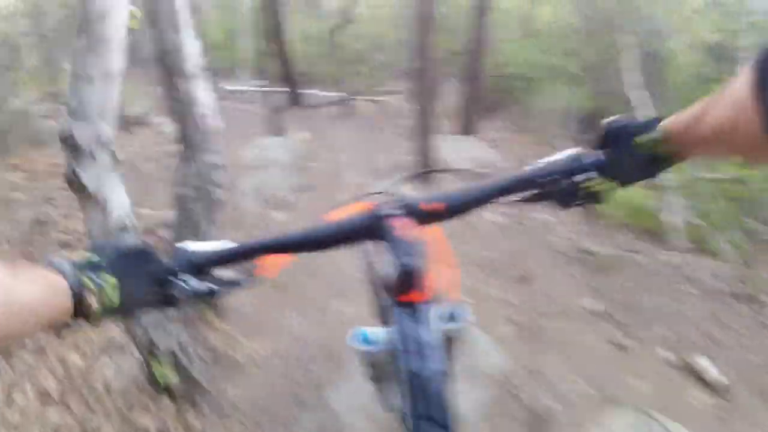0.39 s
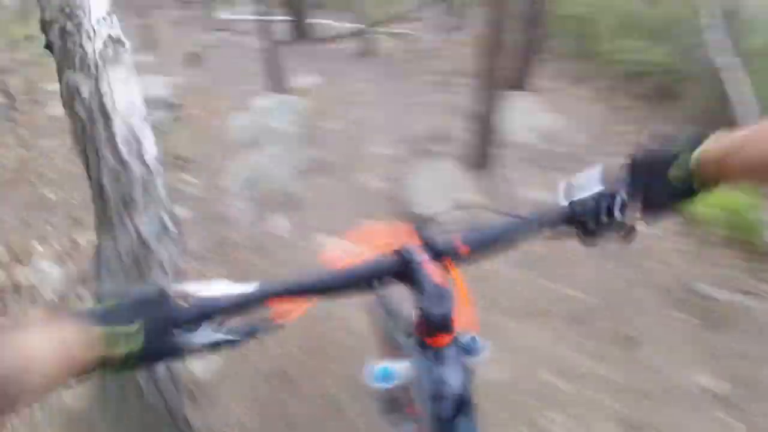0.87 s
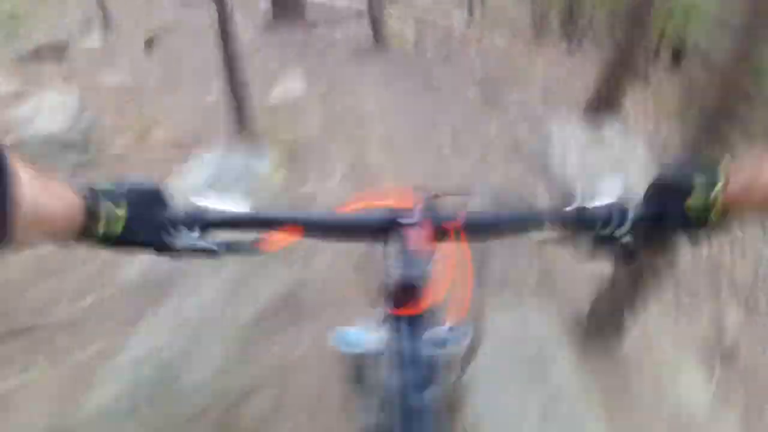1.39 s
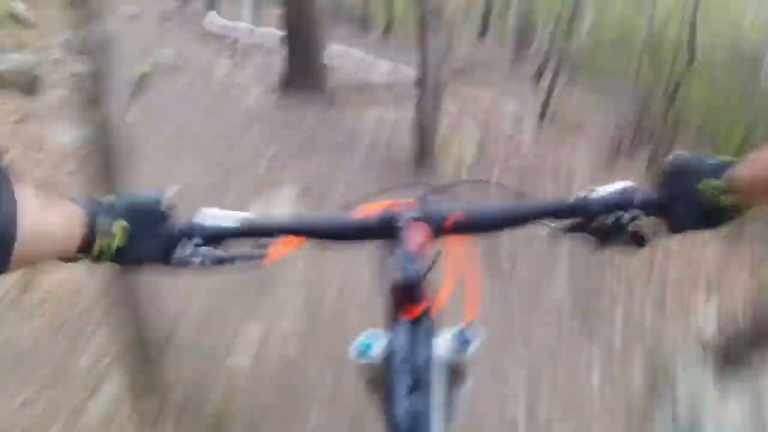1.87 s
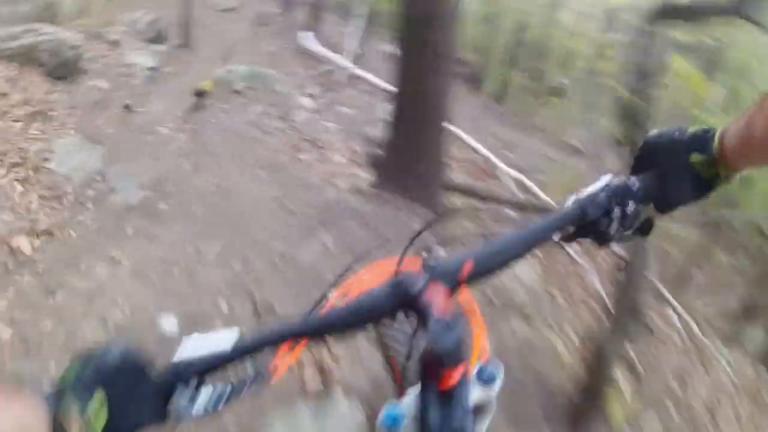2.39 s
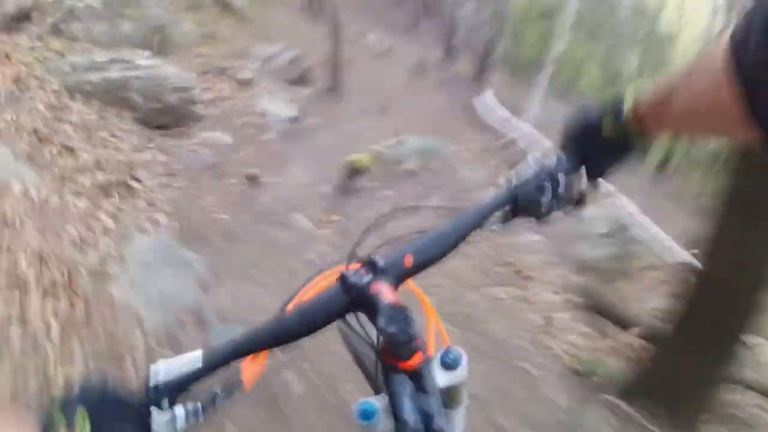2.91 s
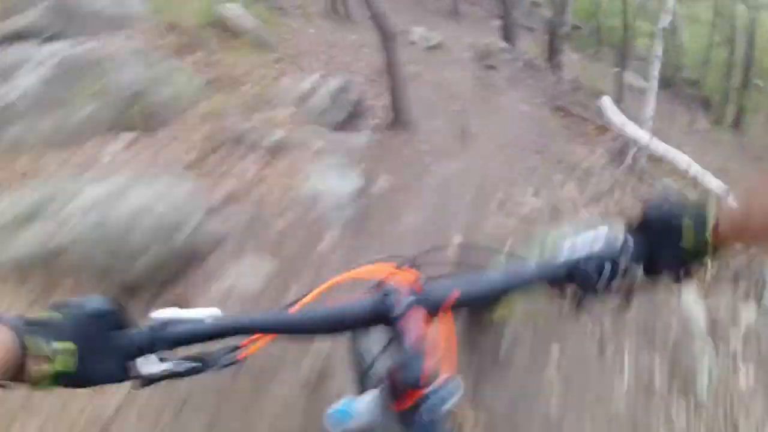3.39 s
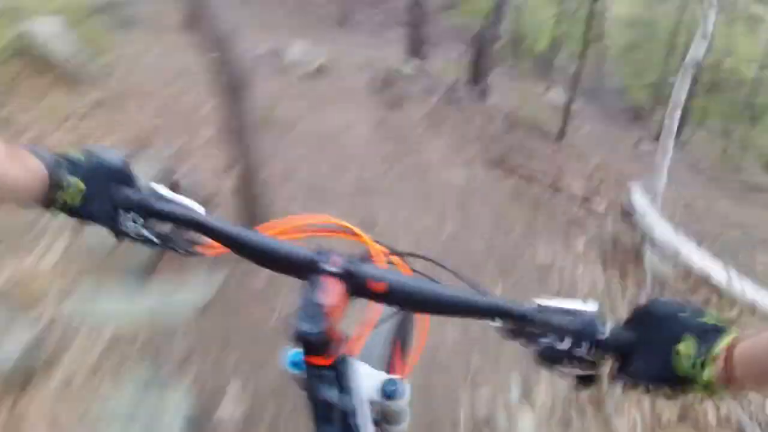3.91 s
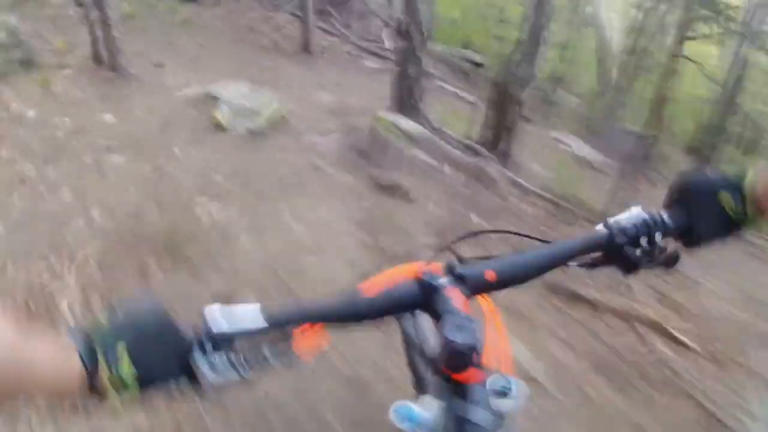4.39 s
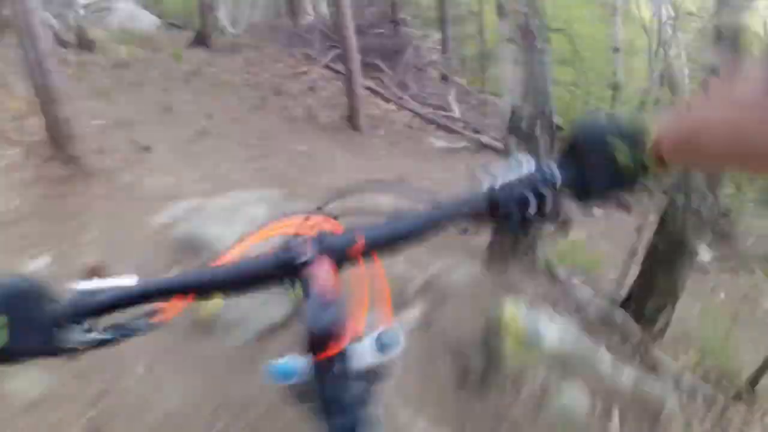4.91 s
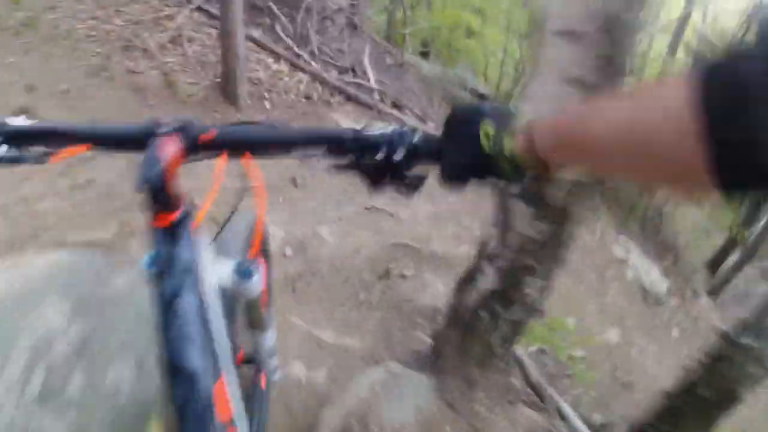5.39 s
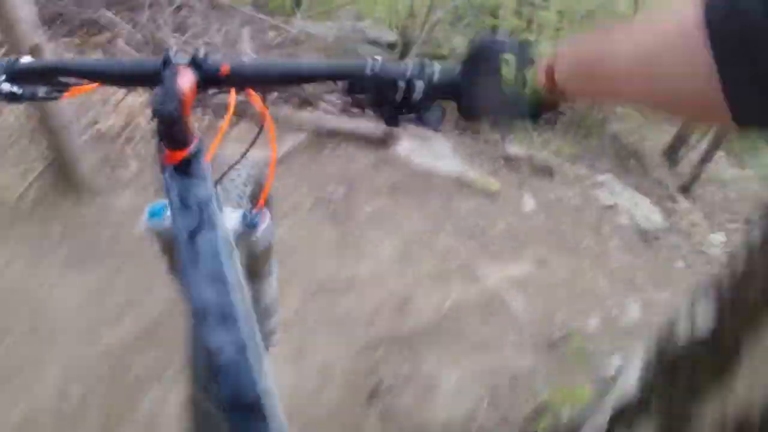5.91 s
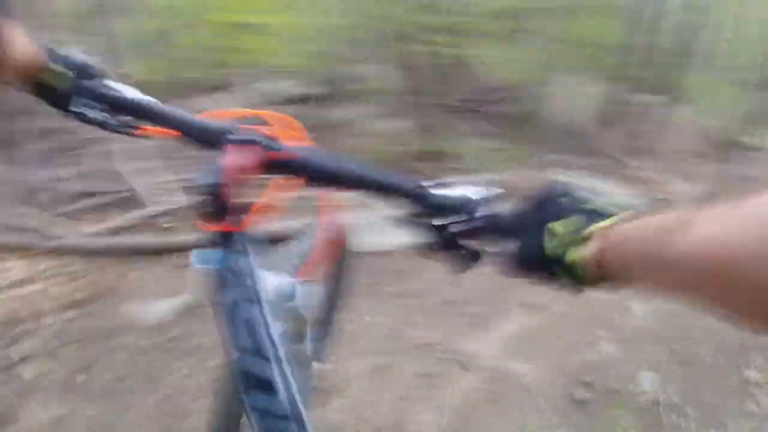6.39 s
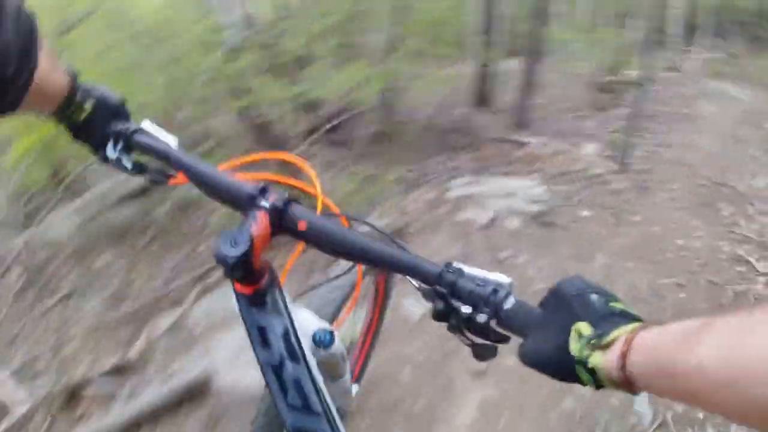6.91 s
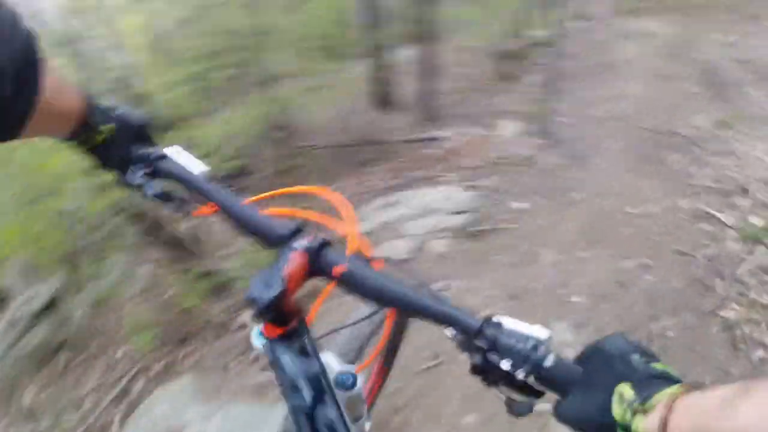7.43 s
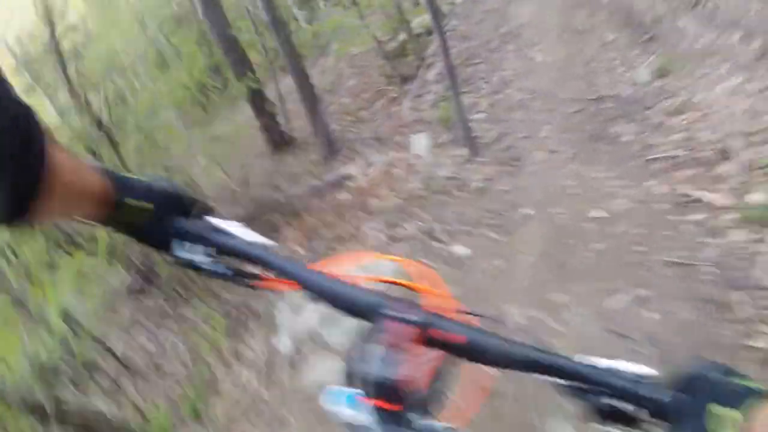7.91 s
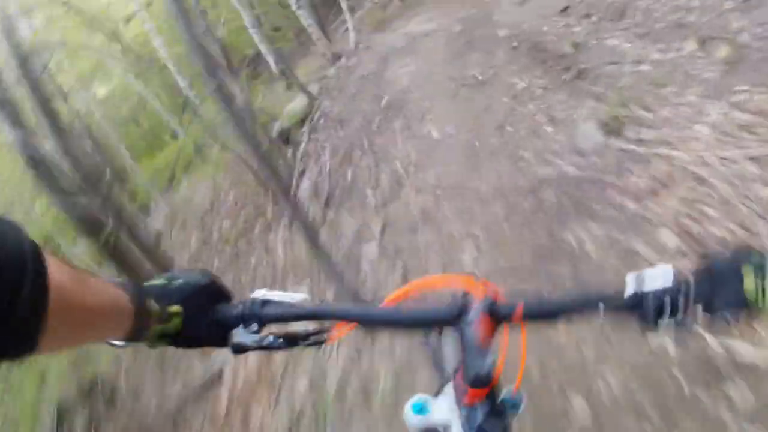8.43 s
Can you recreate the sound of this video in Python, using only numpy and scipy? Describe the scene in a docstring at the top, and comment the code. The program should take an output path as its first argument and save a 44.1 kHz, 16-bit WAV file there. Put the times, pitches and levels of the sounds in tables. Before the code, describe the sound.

A mountain bike descends a rocky dirt trail in woods, heard through a closed plastic housing on the rider's chest: close, dry, boxy, with gritty aliased treble. From 0 to 0.9 s, soft tyre hiss and small scuffs over faint air and low rumble. Around 1.0-1.2 s it hits rock, with a sharp clack at 1.2. From 1.4 to 2.0 comes the densest rattle: hard clacks near 1.54, 1.59 and 1.74, chattering plastic creaks, loud crunch, heavy sagging thuds and wind buffeting. Things ease from 2.3 to 3.4 with scuffs and light taps; quick dry creaks at 3.56, thin ticks at 3.7. From 4.3 jolts and creaks return, a knock at 4.45, then by far the loudest sharp crack at 4.95. Smaller knocks follow to 5.3, a squashy tyre scrape and thud at 5.8, creaks at 6.3-6.6. After that, quiet gritty rolling with a small tick near 7.5 until 8.5.

```python
"""A mountain bike rattles down a rocky trail, heard by a microphone in a closed housing on the rider's chest.
Close by, tyres crunch, scuff and squash on rock: hiss, gritty pops through ringing modes, hums of tyre air.
Knocks ring the housing, its mount creaks in chattering slips, and thin bright ticks stand out.
Below lie sagging thuds of frame and body, ground drumming and lumpy wind; a faint rush of air stays steady.
The recorder samples at 12 kHz and holds each sample, which mirrors the sound into the treble."""
import sys
import numpy as np
from scipy import signal
from scipy.io import wavfile
from scipy.ndimage import uniform_filter1d

SR = 44100
rng = np.random.default_rng(int(sys.argv[2]) if len(sys.argv) > 2 else 0)


def voltage_ratio(level):
    """Linear amplitude factor for a level in decibels (scalar or array-like)."""
    return 10 ** (np.asarray(level, float) / 20)


def generate_wav(sig):
    """Save sig (samples, or channels by samples) to the path in sys.argv[1] as 16-bit PCM at SR."""
    pcm = np.round(np.clip(np.atleast_2d(sig).T, -1, 1) * 32767).astype(np.int16)
    wavfile.write(sys.argv[1], SR, pcm)


N = 376613  # samples

# modes the closed housing rings with: f/Hz, width/Hz, relative level/dB
HOUSING = [(1130, 220, 8.5), (1355, 112, 10), (1506, 350, 15.5), (1827, 145, 10), (2245, 262, 15),
           (2980, 760, 12.5), (3255, 320, 11), (4070, 160, -3.5)]
# the ride along the trail: t/s, wind rumble level/dB, steady tyre crunch level before its blend/dB,
# ground drumming level/dB
TRAIL = [(0, -55.5, -59, -67), (.85, -55.5, -56.5, -58.5), (1.05, -44.5, -57, -60),
         (1.35, -43, -50.5, -52.5), (1.7, -39, -44, -47), (2.05, -45, -49, -57),
         (2.45, -49.5, -53.5, -55.5), (3.05, -50, -55, -55.5), (3.5, -48.5, -53, -53.5),
         (4.2, -48, -54, -56), (4.6, -44, -50.5, -52), (5.2, -43.5, -54.5, -55.5), (5.6, -51.5, -54.5, -56),
         (6.35, -46.5, -57.5, -58), (6.65, -54, -61.5, -67), (7.5, -58.5, -61.5, -71),
         (8.25, -55, -63.5, -68.5), (8.54, -55.5, -56, -68)]
# tyres scuffing over rock and loose grit: middle t/s, level before the crunch blend/dB, length/ms
SCUFFS = [(.396, -50.5, 72), (.475, -55.5, 41), (.564, -52, 40), (1.0, -51.5, 126), (1.099, -43.5, 33),
          (1.196, -49, 79), (1.429, -45, 67), (1.671, -40, 84), (1.81, -38, 19), (1.891, -55, 70),
          (2.09, -45.5, 81), (2.314, -52.5, 36), (2.591, -47.5, 23), (2.925, -54, 15), (3.175, -47, 54),
          (3.288, -51, 120), (3.483, -46.5, 124), (3.693, -53, 16), (3.83, -47, 16), (3.919, -51, 53),
          (4.106, -51, 32), (4.29, -50, 45), (4.423, -43.5, 76), (4.644, -44.5, 11), (4.87, -41.5, 18),
          (4.985, -54, 97), (5.09, -46, 35), (5.281, -47, 106), (5.54, -45.5, 11), (5.76, -51.5, 160),
          (5.831, -47, 79), (6.24, -51.5, 104), (6.33, -49, 35), (6.39, -49, 47), (6.473, -46.5, 16),
          (6.53, -47.5, 16), (6.767, -51.5, 14), (6.93, -56.5, 25), (7.088, -58, 38), (7.194, -52, 46),
          (7.496, -55, 50), (7.74, -56, 29), (8.065, -60.5, 85)]


def read(points, hz):
    """Reads a spectrum between its points, along a logarithmic frequency axis."""
    f, value = np.transpose(points)
    return np.interp(np.log(hz + 1), np.log(f + 1), value)


def evened(x):
    """Scales a signal to an rms of one."""
    return x / np.sqrt(np.mean(x ** 2) + 1e-20)


def add(mix, sound):
    """Adds a sound at the start of a stretch of the mix."""
    mix[:len(sound)] += sound


def control(curve, column=1):
    """Amplitude over time from one dB column of a table."""
    points = np.transpose(curve)
    return voltage_ratio(np.interp(np.arange(N) / SR, points[0], points[column]))


def rings(modes, tilt_db=0, rise_s=0.00034):
    """Response to one tick: a decaying sine for each mode, swelling in softly."""
    hz, width, db = np.transpose(modes)[:, :, None]
    t = np.arange(1200) / SR
    swell = (1 - np.exp(-t / rise_s)) ** 2
    sign = (-1.) ** np.arange(len(hz))[:, None]  # neighbouring modes start in opposite directions
    decay = voltage_ratio(db + tilt_db) * np.exp(-np.pi * width * t)
    return swell * (sign * decay * np.sin(2 * np.pi * hz * t)).sum(0)


def noise(spectrum, size, patch_db, flicker_db, span, wander=0):
    """Random short-time spectra with drifting patches, a flicker common to all bands and wandering pitch."""
    hop = size // 4
    hz = np.fft.rfftfreq(size, 1 / SR)
    a, b, patches = rng.standard_normal((N // hop + 5, len(hz), 3)).T
    flicker = evened(uniform_filter1d(patches[0], size=span))
    patches = uniform_filter1d(patches, size=3, axis=0)
    patches = evened(uniform_filter1d(patches, size=span, axis=1))
    drift = 1 + wander * evened(uniform_filter1d(a[0], size=4 * span))
    level_db = read(spectrum, hz[:, None] * drift) + patch_db * patches + flicker_db * flicker
    z = (a + 1j * b) * voltage_ratio(level_db)
    return evened(signal.istft(z, nperseg=size, noverlap=size - hop)[1][:N])


def bursts(events):
    """Power of sounds that swell, hold and fade over soft edges."""
    edge_s = 0.0037
    power = np.zeros(N)
    for s, db, ms in events:
        first = max(round((s - .3) * SR), 0)
        t = np.arange(first, min(first + round(.6 * SR), N)) / SR
        beyond_s = abs(t - s) - ms / 2000  # time outside the held part
        add(power[first:], voltage_ratio(2 * db) / (1 + np.exp(beyond_s / edge_s)))
    return power


def tyres():
    """A smooth hiss plus grit that pops in clumps and rings the housing at two spots."""
    # tyre hiss inside the housing: f/Hz, relative level/dB per Hz
    hiss_spectrum = [(350, -5), (600, -11.5), (900, -15), (1250, -2), (1600, -16), (1900, 1.5),
                     (2500, -9.5), (3000, -1.5), (4200, -11), (5300, -14.5), (6500, 3.5), (8000, -41)]
    hiss = noise(hiss_spectrum, size=256, patch_db=2.0, flicker_db=1.5, span=12, wander=0.028)
    clumps = voltage_ratio(4.0 * evened(uniform_filter1d(rng.standard_normal(N), size=600)))
    chance, size, spot = rng.random(N), rng.exponential(1, N), rng.standard_normal(N)
    popping = chance < 900 * clumps / SR  # 900 pops a second where clumps is one
    direction = np.sign(np.abs(spot) - .67)  # about half push, half pull
    pops = voltage_ratio(2.55 * np.minimum(size, 3.5)) * popping * direction
    octaves = np.log2(np.transpose(HOUSING)[0][:, None] / 2000)
    dull = signal.oaconvolve(pops * (spot < 0), rings(HOUSING, -4.0 * octaves))
    bright = signal.oaconvolve(pops * (spot > 0), rings(HOUSING, 5.7 * octaves))
    grit = voltage_ratio(-5.5) * evened((dull + bright)[:N])
    crunch = np.sqrt(control(TRAIL, column=2) ** 2 + bursts(SCUFFS))
    return crunch * (voltage_ratio(-4.5) * hiss + grit) + voltage_ratio(-72.5) * hiss


def squashes():
    """A tyre squashed on rock: rubbing noise rings the air in it while it is pressed flat."""
    # presses of the tyre: middle t/s, level/dB, length/ms
    presses = [(.945, -54.5, 7.4), (3.29, -58.5, 54), (5.76, -50, 50), (5.833, -53, 27), (6.22, -53, 22)]
    # resonances of the air inside: f/Hz, width/Hz, relative level/dB
    tyre_air = [(342, 31, 3), (530, 190, -5), (910, 360, -4)]
    t = np.arange(4000) / SR
    ring = np.zeros(len(t))
    for hz, width, db in tyre_air:
        decay = np.sqrt(width) * np.exp(-np.pi * width * t)
        ring += voltage_ratio(db) * decay * np.sin(2 * np.pi * hz * t)
    hum = signal.oaconvolve(rng.standard_normal(N), ring)[:N]
    return np.sqrt(bursts(presses)) * evened(hum)


def crack():
    """First contact bends through the plastic, treble first: a short sweep falling to the middle."""
    from_hz, to_hz, glide_s, fade_s = 3900, 1690, 0.0021, 0.00044
    t = np.arange(1200) / SR
    hz = to_hz + (from_hz - to_hz) * np.exp(-t / glide_s)
    envelope = (1 - np.exp(-t / 0.00026)) ** 2 * np.exp(-t / fade_s)
    return voltage_ratio(11.5) * envelope * np.sin(2 * np.pi * np.cumsum(hz) / SR)


def knocks():
    """Each blow is a brief scrape, a hard tick and weaker rebounds; where it lands sets the share of the modes."""
    # knocks of chain, frame and stones: t/s, peak level before the 220 Hz thump/dB,
    # low-mode offset/dB, high-mode offset/dB, nominal contact/ms
    blows = [(1.0186, -28, -35, -24, 0.85), (1.097, -25.5, -14, 5, 3.1), (1.1927, -14.5, -3.5, -6.5, 1),
             (1.414, -27.5, -2, 3, 6.2), (1.536, -13.5, -6, -3, 2.3), (1.5881, -14, -7, -15, 1.9),
             (1.638, -32, 0, -7, 2.9), (1.649, -29.5, -18, -17, 5.5), (1.658, -32, -15, 8, 2),
             (1.702, -21, -6, -5, 2.3), (1.7385, -14.5, -29, -12, 2.5), (1.7935, -23.5, -3, -19, 3.5),
             (1.82, -30.5, 3, -16, 2.8), (1.8528, -37, -2, -10, 4.9), (1.8854, -27, -17, 5, 1.5),
             (1.9111, -27.5, -4.5, 3.5, 9.7), (2.0573, -22.5, -5, 9, 5.1), (2.1995, -29.5, 2, -29, 1.8),
             (2.2492, -27.5, -5.5, -13, 4.1), (2.76, -38, -27, -4, 7.6), (2.9236, -38.5, -11, 19, 6.2),
             (2.97, -42, -7, 3, 3.6), (3.369, -35, -15, 0, 1.2), (3.692, -30.5, -22, -4, 3.5),
             (3.752, -36.5, -11, 0, 3.6), (3.911, -35.5, -10, -23, 4.8), (4.094, -39, -3, -1, 7),
             (4.33, -39.5, 2, -15, 13), (4.3873, -33.5, -3, 5, 2.5), (4.4264, -30, -20, -7, 3.1),
             (4.454, -19, -20, -2, 1.5), (4.527, -33.5, -26, 3, 3.5), (4.6846, -34.5, -22, -2.5, 12),
             (4.8609, -34.5, -1, -19, 3.8), (4.9032, -32, -17, 16, 1.8), (4.949, -6.5, -4.5, -8, 2.5),
             (4.9917, -27.5, -6, -24, 1.3), (5.1962, -33, -10, 3, 3), (5.251, -27.5, 0, -27, 2.7),
             (5.2738, -31.5, -18, 4, 2.6), (5.89, -33.5, -10, -16, 4.9), (6.2632, -31, -6.5, 6, 9.4),
             (6.48, -32.5, 0, -18, 3.2), (6.748, -40.5, -11, -2, 3.2), (7.471, -43, -15, 6, 1.5),
             (7.493, -31.5, -29.5, 8, 3.8), (7.514, -47, -5, 5, 2)]
    outer_low_db, outer_high_db = 2.5, 8  # a blow drives the outer modes harder than grit does
    out = np.zeros(N + SR)
    lead = 200  # samples of scrape ahead of the tick
    t = (np.arange(1100) - lead) / SR
    hz = np.transpose(HOUSING)[0][:, None]
    low, high = hz < 1550, hz > 2650
    # the stiff housing passes little of a blow outside this band
    stiff = signal.butter(N=2, Wn=[270, 3100], btype="band", fs=SR, output="sos")
    thump = voltage_ratio(-16.5) * (t > 0) * np.sin(2 * np.pi * 220 * t) * np.exp(-t / 0.0016)
    draws = rng.standard_normal((len(blows), len(t), 2)).transpose(0, 2, 1)
    spots = rng.standard_normal((len(blows), len(HOUSING), 2))
    for (s, db, low_db, high_db, ms), (chance, size), spot in zip(blows, draws, spots):
        scrape = 0.33 * np.exp(t / 0.0025)
        rebound = 0.87 * np.exp(-t * 1000 / max(ms, .3))
        fade = np.where(t < 0, scrape, rebound) * min(ms / 3.8, 1)  # brief contacts are cleaner
        hits = (chance > 1.6) * np.clip(size, -1.1, 1.1) * fade
        hits[lead] = 1
        shift = 1 + 0.03 * spot[:, :1] * [1, 0, 0]
        modes = np.array(HOUSING) * [1, 1.6, 1] * shift  # contact damps and shifts the modes
        tilt_db = low * (low_db + outer_low_db) + high * (high_db + outer_high_db)
        ring = rings(modes, tilt_db + 3.6 * spot[:, 1:], rise_s=0.00027)
        blow = signal.sosfilt(stiff, np.convolve(hits, ring + crack()))
        blow /= abs(blow).max()
        add(blow, thump)
        add(out[round(s * SR) - lead:], voltage_ratio(db) * blow)
    return out[:N]


def slipping(events, modes):
    """Dense uneven slips that weaken; each rings a small part a little higher or lower."""
    bends = (-1, 0, 1)
    slips = np.zeros((len(bends), N + SR))
    draws = rng.standard_normal((len(events), 60, 3))
    first = 6  # the main slip; those before it are faint
    for (s, db, ms), draw in zip(events, draws):
        at = np.cumsum(0.0007 * np.exp(0.55 * draw[:, 0]))
        at -= at[first]
        # long creaks start with stronger faint slips
        early = 0.033 * min(ms, 10) * np.exp(np.minimum(at, 0) / 0.004)
        late = voltage_ratio(-300.0 * at) / (1 + np.exp((at - ms / 1000) / 0.00083))
        size = voltage_ratio(db - 4.5 + 2.55 * draw[:, 1]) * np.where(at < 0, early, late)
        size[first] = voltage_ratio(db)
        bend = np.digitize(draw[:, 2], [-.43, .43])  # about a third each
        np.add.at(slips, (bend, np.round((s + at) * SR).astype(int)), size)
    ring = np.array([rings(np.array(modes) * [1 + 0.033 * b, 1, 1], rise_s=.0001) for b in bends])
    return signal.oaconvolve(slips, ring / abs(ring).max(), axes=1).sum(0)[:N]


def mount_creaks():
    """The plastic mount slips or chatters in short bursts and rings."""
    # creaks of the mount: main slip t/s, its level/dB, length/ms
    events = [(0.989, -29.5, 11), (1.1578, -33.5, 4.2), (1.179, -38, 4.1), (1.1918, -35, 2),
              (1.4446, -21.5, 2.1), (1.4535, -29, 3), (1.474, -25.5, 11.3), (1.533, -27.5, 10),
              (1.553, -40, 10), (1.569, -34.5, 12), (1.669, -20, 5.4), (1.6745, -25, 2.2),
              (1.7285, -26, 7.1), (1.8265, -28, 4.6), (1.8633, -33, 11), (1.964, -32, 7.7),
              (1.9763, -31, 11.5), (3.556, -28, 0.65), (3.562, -27, 0.8), (3.568, -23, 1),
              (3.5722, -35, 9.2), (3.6112, -44, 6), (3.623, -38.5, 7.2), (4.2802, -31.5, 11.5),
              (4.3284, -25.5, 12.6), (4.406, -33, 12), (4.42, -35, 11), (4.4564, -30, 7.7),
              (4.7305, -29, 4.2), (4.742, -28, 11.5), (4.822, -38, 5.7), (4.836, -34.5, 12),
              (4.8672, -34, 6.4), (4.9486, -6, 0.72), (4.9715, -41, 6.1), (5.0825, -27, 6.5),
              (5.2603, -31.5, 12), (5.3134, -28, 13), (6.329, -30.5, 5.4), (6.3397, -26.5, 7.9),
              (6.377, -27.5, 9.5), (6.433, -34, 12), (6.452, -40, 14), (6.4777, -32.5, 3.4),
              (6.555, -39, 5.3), (6.5882, -37, 10)]
    # modes of the mount: f/Hz, width/Hz, relative level/dB
    mount = [(5100, 677, 8.5), (3870, 1370, -4), (3540, 1110, 6)]
    return slipping(events, mount)


def bright_ticks():
    """Thin bright ticks, perhaps a cable on the frame, made of slips ringing two high modes."""
    # ticks: main slip t/s, its level/dB, length/ms
    events = [(3.682, -42, 5.8), (3.691, -34, 10.3), (5.939, -42, 1.1)]
    # modes of a tick: f/Hz, width/Hz, relative level/dB
    modes = [(3960, 250, 1), (5500, 810, 1)]
    return slipping(events, modes)


def jolts():
    """Each thud is a short swing whose pitch sags; returns the sound and its power."""
    # thuds of frame and rider's body that shake the housing: middle t/s, envelope peak level/dB, middle f/Hz
    thuds = [(0.277, -44.5, 52.7), (.434, -44, 40), (0.65, -41, 53.3), (1.007, -38, 44), (1.141, -38, 38.6),
             (1.25, -37, 42.5), (1.488, -34, 37.4), (1.568, -32.5, 37.6), (1.685, -31, 40),
             (1.805, -33, 40.3), (2.12, -35.5, 40), (2.266, -39.5, 32.6), (2.804, -45, 51.7),
             (3.071, -43, 39.5), (3.285, -45, 55.3), (3.634, -40, 49.7), (4.1, -38, 33.3),
             (4.361, -33.5, 37.8), (4.456, -35, 62.5), (4.631, -35, 59), (4.879, -32, 65.3),
             (5.15, -35.5, 40.4), (5.235, -36, 47.5), (5.493, -41.5, 63.3), (5.816, -32.5, 38.6),
             (6.317, -36.5, 42.5), (6.972, -48, 55), (7.338, -46.5, 50.7), (7.713, -48, 57.4),
             (8.477, -47, 60.7)]
    cycles, sag = 0.42, 0.296  # a thud lasts about a cycle and its pitch sags
    sound, power = np.zeros((2, N + SR))
    half = SR // 10
    t = np.arange(-half, half) / SR
    for (s, db, hz), start in zip(thuds, rng.random((len(thuds), 1))):
        u = t * hz / cycles
        shape = voltage_ratio(db) * np.exp(-u ** 2 / 2)
        turns = np.cumsum(hz * (1 - sag * np.tanh(u))) / SR + start
        begin = round(s * SR) - half
        add(sound[begin:], shape * np.sin(2 * np.pi * turns))
        add(power[begin:], shape ** 2)
    return sound[:N], power[:N]


def ground_drumming(shaking):
    """The ground drums through the frame as low noise that follows trail, scuffs and jolts."""
    # drumming: f/Hz, relative level/dB per Hz
    spectrum = [(60, -5), (150, 5), (330, -4.5), (450, -15.5), (700, -22), (1100, -32), (2000, -67)]
    scuff_db, jolt_db = -13, -16  # drumming against scuffs and jolts
    drum = noise(spectrum, size=1024, patch_db=2.0, flicker_db=2.0, span=8)
    power = control(TRAIL, column=3) ** 2
    power = power + voltage_ratio(2 * scuff_db) * bursts(SCUFFS) + voltage_ratio(2 * jolt_db) * shaking
    return np.sqrt(power) * drum


def wind():
    """Lumpy low buffeting: patchy noise whose level follows the ride."""
    # rumble: f/Hz, relative level/dB per Hz
    rumble = [(8, 6.5), (25, 2.5), (50, -8.5), (110, -10.5), (200, -29.5), (400, -53)]
    return control(TRAIL) * noise(rumble, size=2048, patch_db=2.0, flicker_db=2.0, span=3)


def air_rush():
    """A faint steady rush of air: shaped noise at a constant mean level."""
    # rush: f/Hz, relative level/dB per Hz
    spectrum = [(300, 4.5), (800, -4.5), (1300, -20), (2500, -28), (4800, -17), (7000, -35)]
    return voltage_ratio(-69) * noise(spectrum, size=1024, patch_db=1.0, flicker_db=-1.0, span=6)


def scene():
    """The whole ride as it reaches the microphone, in one channel."""
    thuds, shaking = jolts()
    bike = tyres() + squashes() + knocks() + mount_creaks() + bright_ticks()
    low = thuds + ground_drumming(shaking) + wind()
    return (bike + low + air_rush())[None]


def low_pass(x):
    """Removes everything above the highest recorded frequency."""
    return signal.sosfilt(signal.butter(12, 16470, fs=SR, output="sos"), x)


def record(dry):
    """A leaky low-pass, then sampling at 12 kHz with each sample held for four steps of a 48 kHz clock."""
    hold_hz = 12000
    smooth = signal.firwin(201, 5500, window=("kaiser", 5.0), fs=SR)
    leaky = signal.oaconvolve(dry[0], smooth, "same") + voltage_ratio(-10.5) * dry[0]
    slow = signal.resample_poly(leaky, hold_hz, SR)
    held = signal.resample_poly(np.repeat(slow, 4), SR, 4 * hold_hz)[:N]  # mirrored above 6 kHz
    edge = signal.firwin(401, 15300, window=("kaiser", 3.0), fs=SR)
    mix = signal.oaconvolve(held, edge, "same")[None]
    return low_pass(mix)


dry = scene()
out = record(dry)
generate_wav(out)
```